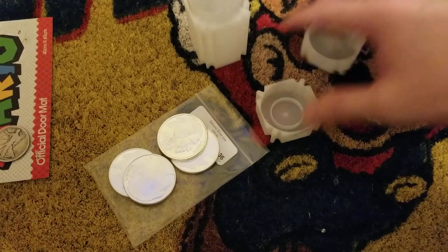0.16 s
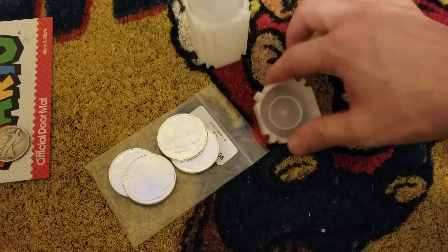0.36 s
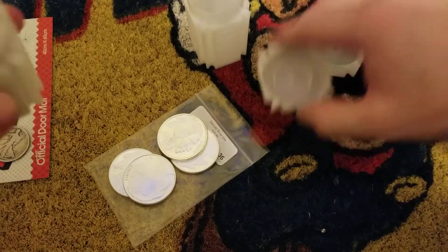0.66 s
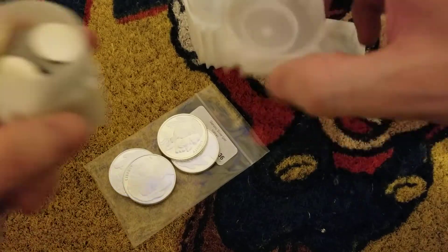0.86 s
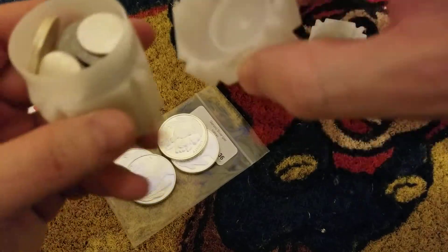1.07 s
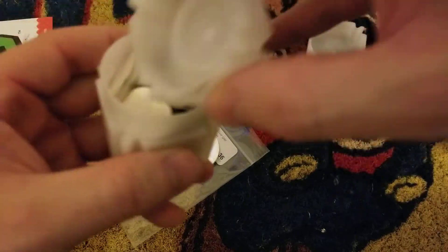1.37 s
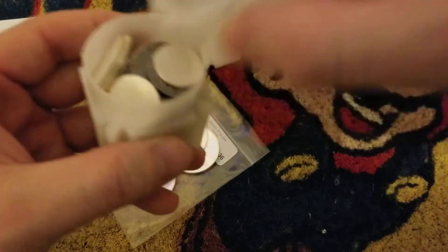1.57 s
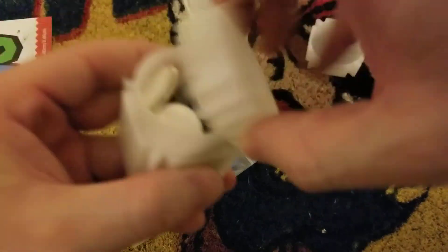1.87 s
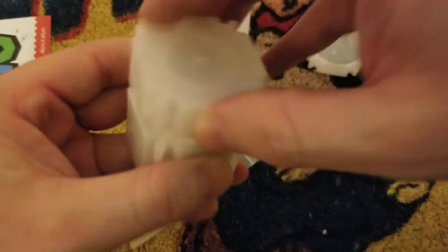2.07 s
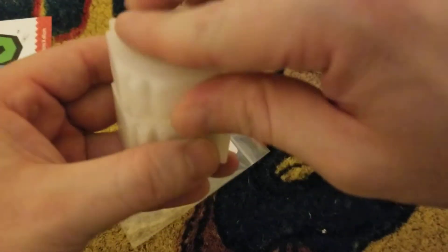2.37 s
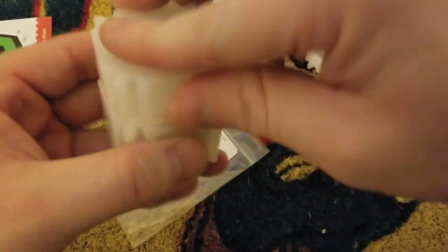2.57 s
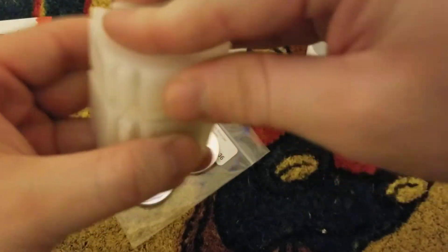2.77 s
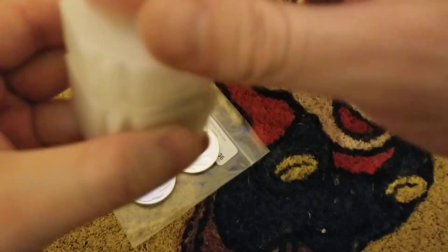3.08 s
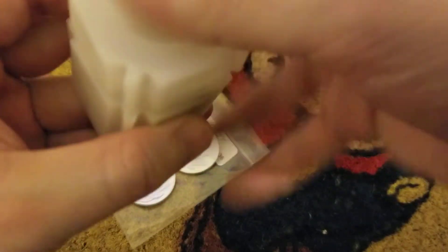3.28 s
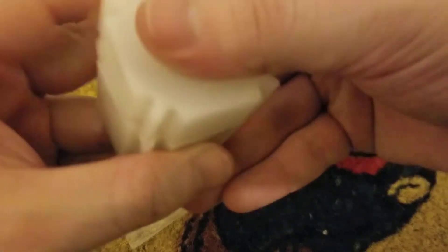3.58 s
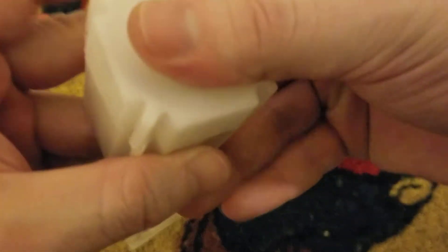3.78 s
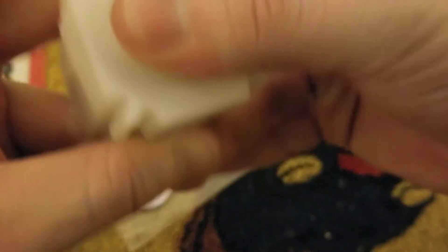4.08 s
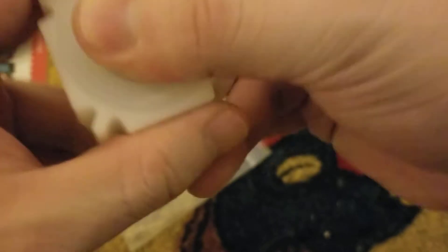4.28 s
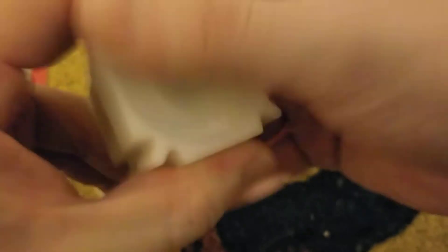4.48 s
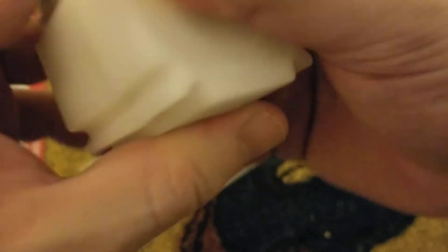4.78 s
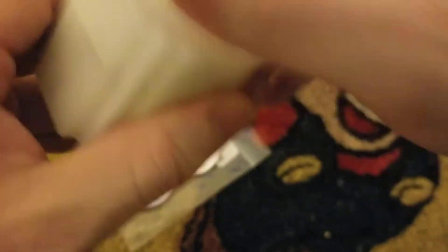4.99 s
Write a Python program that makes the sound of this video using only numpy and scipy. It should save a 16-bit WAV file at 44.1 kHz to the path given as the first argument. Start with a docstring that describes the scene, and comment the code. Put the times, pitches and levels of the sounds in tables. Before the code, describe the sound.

Close up in a small room, a plastic cap clicks and drags briefly on a coarse mat, then fingers rub it. Coins rattle shortly in a plastic tube, the cap knocks hollowly against it, skin slides softly, and the cap snaps hard twice, about a second apart, before small closing clicks. Low uneven rumble and faint hiss lie underneath.

```python
"""Plastic clicks and a cap dragging over a doormat come first, over a low rumble and faint hiss.
Hands lift the hollow cap, tip a plastic tube of coins, knock the cap onto it and press it shut.
Contacts: noise cracks plus struck modes of cap air and tube wall. Coins: knocks through metal modes.
Fingers: grainy coloured noise. Mat: low modes and bumpy noise. Close microphone, short decaying-noise room."""
import sys
import numpy as np
from scipy import signal
from scipy.fft import rfft, irfft, next_fast_len
from scipy.io import wavfile
from scipy.ndimage import map_coordinates

SR = 44100
rng = np.random.default_rng(int(sys.argv[2]) if len(sys.argv) > 2 else 0)


def wrap_up_sound(samples):
    """Save the sound to the file named by the first command line argument, as 16-bit audio."""
    columns = np.atleast_2d(samples).T
    # keep every value between -1 and 1, then stretch to whole-number steps
    tamed = np.clip(columns, -1, 1)
    steps = np.round(tamed * 32767).astype(np.int16)
    wavfile.write(sys.argv[1], SR, steps)


N = 226301


def amp(db):
    """dB to linear gain."""
    return 10 ** (np.asarray(db) / 20)


def unit(x):
    """Scale to rms 1."""
    return x / np.sqrt(np.mean(x ** 2) + 1e-20)


def along(points, hz):
    """Interpolate (hz, value) points on a log frequency axis."""
    point_hz, value = np.transpose(points)
    return np.interp(np.log(hz + 1), np.log(point_hz + 1), value)


def curves(rows):
    """One per-sample curve for each column after the time."""
    time_s, *columns = np.transpose(rows)
    return [np.interp(np.arange(N) / SR, time_s, column) for column in columns]


def wobble(knots_per_s):
    """Smooth random curve through normal knots."""
    knots = rng.standard_normal(int(N * knots_per_s / SR) + 4)
    return map_coordinates(knots, [np.arange(N) * knots_per_s / SR])


def filtered(x, response):
    """Apply a complex frequency response by FFT, zero-padded."""
    size = next_fast_len(len(x) + 4096)
    return irfft(rfft(x, size) * response(np.fft.rfftfreq(size, 1 / SR)), size)[:len(x)]


def mode(hz, width_hz):
    """Causal second-order resonance, gain 1 at its centre."""
    return lambda f: 1j * f * width_hz / (hz * hz - f * f + 1j * f * width_hz)


def noise(spectrum):
    """Noise coloured by (hz, dB) points, rms 1."""
    return unit(filtered(rng.standard_normal(N), lambda hz: amp(along(spectrum, hz))))


def decay(t, t60_s, attack_s):
    """Exponential decay with a soft attack."""
    return amp(-60 * t / t60_s) * (1 - np.exp(-t / attack_s))


def ring(t, hz, t60_s, attack_s):
    """Struck mode: a decaying sine."""
    return np.sin(2 * np.pi * hz * t) * decay(t, t60_s, attack_s)


def add(track, start_s, sound):
    """Mix a sound into a track, cut at the track's end."""
    spot = track[max(round(start_s * SR), 0):][:len(sound)]
    spot += sound[:len(spot)]


# low rumble level: time_s, level_db
RUMBLE_LEVEL = [(0, -43), (.2, -54.5), (1.0, -50), (1.13, -61), (1.39, -54.5), (2.34, -50), (2.8, -57),
                (3.31, -49), (3.52, -56.5), (3.6, -39), (3.79, -52.5), (4.87, -55), (5.13, -41)]
# rumble spectrum: pitch_hz, relative level_db (per Hz)
RUMBLE_SPECTRUM = [(12, -51), (20, -30.5), (39, -7), (60, 1.5), (91, -11.5), (123, -13.5), (193, -27.5),
                   (230, -25), (400, -39.5), (520, -72), (880, -120)]
# room and microphone hiss spectrum: pitch_hz, relative level_db (per Hz)
HISS_SPECTRUM = [(150, -35), (250, -10.5), (702, -4), (961, -12), (1740, -10.5), (2270, -17.5),
                 (3960, -31.5), (8410, -10), (12600, -15.5), (14200, -14.5), (16400, -25)]
HISS_DB = -74


def background():
    """Uneven low rumble plus a nearly steady hiss of room and microphone, both coloured noise."""
    uneven = unit(amp(1.5 * wobble(25)) * noise(RUMBLE_SPECTRUM))
    rumble = amp(curves(RUMBLE_LEVEL)[0]) * uneven
    return rumble + amp(HISS_DB + 0.54 * wobble(32)) * noise(HISS_SPECTRUM)


# reverberation time: pitch_hz, t60_s
ROOM_DECAY = [(300, 0.24), (2300, 0.21), (8000, 0.15), (15000, 0.16)]


def room(x):
    """Noise tails of unit energy, each frequency with its own decay; each 1/8 s of input meets a new tail."""
    out, step = np.zeros(N), SR // 8
    for i in range(0, N, step):
        hz, t, bins = signal.stft(rng.standard_normal(SR // 3), SR, nperseg=256)
        fade = amp(-60 * t / along(ROOM_DECAY, hz)[:, None])
        tail = signal.istft(bins * fade, SR, nperseg=256)[1]
        tail = tail / np.linalg.norm(tail)
        add(out, i / SR + 0.0041, signal.fftconvolve(x[i:i + step], tail))
    return out


# soft bumps that shake the microphone stand: start_s, level_db
BUMPS = [(0.828, -32.5), (2.675, -38), (2.819, -37), (3.251, -36.5), (4.048, -30.5), (4.142, -35.5),
         (4.691, -35), (4.972, -31)]
STAND_HZ, STAND_T60_S = 59.2, 0.14


def stand_bumps():
    """Each bump rings one low mode of the microphone stand."""
    out, t = np.zeros(N), np.arange(SR // 4) / SR
    for start_s, level_db in BUMPS:
        add(out, start_s, -amp(level_db) * ring(t, STAND_HZ, STAND_T60_S, 0.0008))
    return out


# low pushes of the harder contacts: start_s, level_db, pitch_hz
THUMPS = [(0.012, -25.5, 195), (.026, -16, 180), (0.068, -16.5, 162), (.113, -21.5, 175),
          (.519, -32.5, 201), (1.876, -25.5, 261.1), (1.992, -29, 139), (2.063, -28, 178),
          (3.562, -3, 110.7), (3.5633, -9, 322), (4.537, -21, 97)]
THUMP_T60_CYCLES = 4.5


def thumps():
    """Each push is a low mode that dies within a few cycles."""
    out, t = np.zeros(N), np.arange(SR // 4) / SR
    for start_s, level_db, hz in THUMPS:
        add(out, start_s, -amp(level_db) * ring(t, hz, THUMP_T60_CYCLES / hz, 0.00052))
    return out


# cap dragged over the mat: time_s, level_db
DRAG_LEVEL = [(0.0, -33), (0.074, -33), (0.298, -58), (0.59, -44), (0.72, -102)]
# bristle noise spectrum: pitch_hz, relative level_db (per Hz)
MAT_SPECTRUM = [(47, -51), (80, -18), (151, 4), (188, -12), (227, -4.5), (321, -18.5), (700, -35),
                (910, -68), (1540, -120)]


def mat_drag():
    """Cap bumping over the bristles: low noise with random swells, ended at the last level point."""
    dragging = np.arange(N) < DRAG_LEVEL[-1][0] * SR
    bristles = unit(amp(3 * wobble(40)) * noise(MAT_SPECTRUM))
    return amp(curves(DRAG_LEVEL)[0]) * dragging * bristles


# air in the cap, tuned by how far mat, fingers or tube close its mouth: time_s, pitch_hz, nominal width_hz
CAP_AIR = [(0, 2823, 704), (.21, 2820, 693), (0.234, 2200, 299), (.55, 2146, 352.7), (.86, 2300, 259.4),
           (1.95, 2330, 259.2), (2.06, 2067, 303), (2.2, 2220, 301.4), (2.901, 2353, 297.8),
           (3.15, 2647, 701), (3.3, 2941, 804.4), (5.13, 2838, 958)]


def cap_air(hz, width_hz):
    """Narrow noise of rms 1 around a moving centre; a wider resonance flutters faster."""
    flutter = np.cumsum(width_hz) / SR * 0.9
    knots = rng.standard_normal((2, N // 20))
    cos_part, sin_part = (map_coordinates(k, [flutter]) for k in knots)
    phase = 2 * np.pi * np.cumsum(hz) / SR
    return unit(cos_part * np.cos(phase) + sin_part * np.sin(phase))


def swell(u, peak_place):
    """Rises to 1 at peak_place (0-1), then dies."""
    peak_place = np.clip(peak_place, 0.02, 0.98)
    return np.sin(np.interp(u, [0, peak_place, 1], [0, np.pi / 2, np.pi])) ** 1.9


# fingers sliding over the plastic: time_s, hiss_db
SLIDE_LEVEL = [(0, -61), (.19, -59.5), (.52, -64.5), (.66, -75), (.75, -60.5), (.94, -62.5), (1.11, -67),
               (1.34, -87), (1.4, -65), (1.6, -71.5), (1.79, -82), (2.03, -63.5), (2.15, -74.5),
               (2.42, -63), (2.5, -77), (2.8, -78.5), (3.0, -63), (3.17, -56), (3.32, -63.5), (3.53, -73.5),
               (3.64, -58), (3.86, -65.5), (3.96, -80.5), (4.2, -66), (4.35, -77.5), (4.52, -53.5),
               (4.75, -79), (4.9, -61.5), (5.13, -72)]
# quick swipes of skin on a rib: start_s, length_s, peak_place (0-1), hiss_db, hiss_hz, hollow_db, wall_db
SWIPES = [(.246, 0.039, 0.96, -59, 8460, -51.5, -67), (.409, 0.059, 0.8, -51.5, 8700, -65, -80),
          (.498, 0.06, 0.43, -54, 9100, -65, -56), (.708, 0.1, 0.52, -54, 7970, -58, -56.5),
          (.783, 0.074, 0.46, -62, 9000, -72, -57), (.98, 0.078, 0.75, -53.5, 6250, -50, -66.5),
          (1.54, 0.031, 0.52, -46, 9800, -57.5, -79), (1.98, 0.021, 0.63, -56, 7600, -33.5, -41),
          (2.187, 0.088, 0.17, -58, 13400, -57, -68), (2.29, 0.067, 0.21, -55.5, 13000, -60, -64),
          (2.375, 0.086, 0.32, -63, 6000, -63, -84), (2.756, 0.072, 0.33, -65, 7900, -71, -72.5),
          (3.062, .028, 0.72, -31, 4894, -40, -73), (3.095, 0.04, 0.4, -58, 9000, -59, -77),
          (3.15, 0.084, 0.4, -88, 6000, -53, -63), (3.484, .03, 0.5, -59, 11970, -81, -80),
          (3.674, 0.051, 0.43, -59, 4440, -54.5, -52), (3.742, 0.036, 0.33, -44.5, 8680, -50, -52.5),
          (4.041, .014, 0.32, -44.5, 10100, -69, -73), (4.15, .13, 0.32, -50.5, 12800, -59.5, -73),
          (4.408, 0.085, 0.71, -29.5, 6510, -40.5, -65), (4.653, 0.035, 0.37, -59.5, 11500, -74.5, -78),
          (4.781, 0.068, 0.54, -56, 6330, -62.5, -78.5), (4.909, 0.05, .65, -46, 5770, -64, -80),
          (5.009, 0.13, 0.26, -51.5, 5460, -73, -81.5), (5.076, .064, 0.5, -54.5, 7960, -43, -52)]
# loose plastic rattling and ringing on after a hard knock: start_s, length_s, hiss_db, hollow_db, wall_db
AFTER_RATTLE = [(1.815, 0.1, -53, -36, -42), (1.878, 0.14, -73, -50.5, -59),
                (2.005, 0.081, -57, -52, -44.5), (3.257, 0.042, -41.5, -40.5, -51.5),
                (3.557, 0.095, -35.5, -39, -38), (4.556, 0.063, -54.5, -60.5, -60.5)]
AFTER_RATTLE_PEAK_PLACE, AFTER_RATTLE_HZ = 0.09, 6000
# skin on the loose cap: pitch_hz, relative level_db (per Hz)
LOOSE_SKIN = [(1500, -28.5), (2600, -11.5), (3150, -6.5), (4200, -10.5), (5800, -8.5), (8700, -7),
              (10500, -9), (14000, -9.5), (16400, -17.5)]
# skin on the shut tube: pitch_hz, relative level_db (per Hz)
SHUT_SKIN = [(710, -58.5), (1200, -20), (2210, -4.5), (3010, -5.5), (4760, -2), (5790, -2), (8670, -2.5),
             (10000, -3), (14500, -2), (16400, -8)]
# wall the hands touch, damped and tuned by the grip: time_s, pitch_hz
WALL_PITCH = [(0, 586), (.135, 630), (.16, 1444), (1.7, 1154), (1.87, 1150), (1.99, 890), (2.01, 760),
              (2.8, 850), (3.1, 1230), (3.5, 1200), (3.562, 550), (3.59, 1398), (3.75, 1200), (4.2, 1150),
              (4.8, 1100), (4.97, 600), (5.07, 1302)]
# resonance level relative to the slide hiss, cap loose and cap shut
HOLLOW_LOOSE_DB, HOLLOW_SHUT_DB = -7, -15.5
WALL_LOOSE_DB, WALL_SHUT_DB = -9.5, -16.5
ON_MAT_DB, LIFT_S = 6.5, 0.59  # the mat's backing makes the wall louder until the cap is lifted


def fingers():
    """Skin catches and slips, and loose plastic rattles: noise grains that also sound cap air and tube wall."""
    time_s = np.arange(N) / SR
    hiss, wall_hz = amp(curves(SLIDE_LEVEL)[0]), curves(WALL_PITCH)[0]
    cap_hz, cap_width_hz = curves(CAP_AIR)
    shut = np.clip((time_s - 2.9) / 0.2, 0, 1)  # the cap comes to sit on the tube
    hollow = hiss * amp(HOLLOW_LOOSE_DB + (HOLLOW_SHUT_DB - HOLLOW_LOOSE_DB) * shut)
    wall_level = hiss * amp(WALL_LOOSE_DB + (WALL_SHUT_DB - WALL_LOOSE_DB) * shut)
    wall_level = wall_level * amp(ON_MAT_DB * (np.arange(N) < LIFT_S * SR))

    grain = amp(1.5 * wobble(300) + 1.2 * wobble(40))

    def slips():
        return grain * amp(2.5 * wobble(120)) * rng.standard_normal(N)

    skin_noise = (1 - shut) * noise(LOOSE_SKIN) + shut * noise(SHUT_SKIN)
    skin = unit(grain * amp(1.1 * wobble(900)) * skin_noise)
    knocks = unit(slips())
    wall_noise = unit(filtered(slips(), lambda f: mode(1150, 1200)(f) ** 2))
    out = hiss * skin + wall_level * wall_noise

    rattles = [(start_s, length_s, AFTER_RATTLE_PEAK_PLACE, hiss_db, AFTER_RATTLE_HZ, hollow_db, wall_db)
               for start_s, length_s, hiss_db, hollow_db, wall_db in AFTER_RATTLE]
    for start_s, length_s, peak_place, hiss_db, hiss_hz, hollow_db, wall_db in [*SWIPES, *rattles]:
        tube_hz = wall_hz[round((start_s + length_s / 2) * SR)]
        u = np.linspace(0, 1, round(length_s * SR))
        shape = swell(u, peak_place)
        span = slice(round(start_s * SR), round(start_s * SR) + len(u))
        rub = filtered(skin[span], lambda f: 1 + 1.3 * mode(hiss_hz, 0.22 * hiss_hz)(f))
        wall = filtered(knocks[span], lambda f: mode(tube_hz, 0.9 * tube_hz)(f) ** 2)
        contact = amp(hiss_db) * unit(rub) + amp(wall_db) * unit(wall)
        add(out, start_s, shape[:len(rub)] * contact)
        add(hollow, start_s, amp(hollow_db) * shape)
    return out + hollow * unit(grain) * cap_air(cap_hz, 2.2 * cap_width_hz)


# coins slide and knock in the tube: start_s, rattle_db, body_db (tube and cap drive)
CHINKS = [(1.3587, -26.5, 3.5), (1.363, -21, -1.5), (1.3744, -20, 5), (1.3786, -25.5, 0), (1.39, -23, 0),
          (1.399, -37, -12), (1.4115, -42, -13.5), (1.4222, -41.5, -10), (1.4353, -29, -1.5),
          (1.4458, -33, -9)]
# coin modes: pitch_hz, width_hz, relative level_db
COIN_MODES = [(5300, 300, -10), (7400, 300, -12), (8100, 300, -13), (10650, 260, 0), (12850, 350, -2),
              (13500, 450, -4), (14600, 400, -8)]
COIN_RING_DB, COIN_RING_HZ = -5, 45  # long, narrow part of each mode: relative level, width
RATTLE_T60_S = 0.038


def coin_metal(f):
    """Response of the damped coins: bright direct part plus wide and narrow modes."""
    modes = 0
    for hz, width_hz, level_db in COIN_MODES:
        narrow = amp(COIN_RING_DB) * mode(hz, COIN_RING_HZ)(f)
        modes = modes + amp(level_db) * (mode(hz, width_hz)(f) + narrow)
    return 0.96 * f * f / (f + 3500 / 1j) ** 2 + 4 * modes


def coin_body(f):
    """Response of the tube and the cap held near it."""
    return 0.57 * mode(1300, 170)(f) - mode(2390, 180)(f) + 0.089 * mode(1200, 1800)(f)


def coins():
    """Decaying noise bursts stand for tiny knocks that excite coins, tube and cap."""
    rattle, knocks, t = np.zeros(N), np.zeros(N), np.arange(SR // 10) / SR
    fade = decay(t, RATTLE_T60_S, 0.001)
    for start_s, rattle_db, body_db in CHINKS:
        add(rattle, start_s, amp(rattle_db) * fade * rng.standard_normal(len(t)))
        add(knocks, start_s, amp(body_db) * fade ** 2 * rng.standard_normal(len(t)))
    return filtered(rattle, coin_metal) + filtered(knocks, coin_body)


# small ticks under the sliding fingers
TICKS_PER_S = 14  # mean over the scene
TICK_DB, TICK_SPREAD_DB = 9, 3.5  # offset over the slide hiss; spread per neper of chance
TICK_CAP_DB, TICK_TUBE_DB = 0.5, -11  # relative to the crack


def ticks():
    """Random small contacts, as dense and as loud as the sliding under them."""
    chance = rng.random((round(TICKS_PER_S * N / SR), 3))
    travel = np.cumsum(amp(curves(SLIDE_LEVEL)[0]))
    start_s = np.interp(chance[:, 0], travel / travel[-1], np.arange(N) / SR) * 0.998
    slide_db = np.interp(start_s, *np.transpose(SLIDE_LEVEL))
    crack_db = slide_db + TICK_DB - TICK_SPREAD_DB * np.log(chance[:, 1] + 0.0089)
    crack_hz = 4000 + 7000 * chance[:, 2]
    return np.transpose([start_s, crack_db, crack_db + TICK_CAP_DB, crack_db + TICK_TUBE_DB, crack_hz])


# plastic contacts: start_s, crack_db, cap_db (hollow ring), tube_db (knock), crack_hz
CLICKS = [(.0247, -44, -23, -22, 3420), (.0665, -39, -46, -26.5, 5630), (.0915, -30, -27, -31, 9900),
          (.1084, -34.5, -28.5, -58, 9690), (.1326, -36, -28, -39, 12600),
          (.1382, -33.5, -29.5, -57, 11400), (.1454, -38, -30, -38.5, 5460), (.186, -40.5, -37, -60, 5570),
          (.2024, -39, -33.5, -43, 11700), (.3202, -47.5, -27, -63.5, 8500),
          (.3434, -37, -31.5, -39.5, 8500), (.3725, -49, -42, -40.5, 5650), (.3934, -36, -35, -44, 8600),
          (.4943, -40, -45, -62, 8700), (.5255, -37.5, -39, -59, 8500), (.6943, -39, -61, -71, 6320),
          (.8512, -29, -29.5, -40, 8100), (1.1391, -53, -63, -58, 7650), (1.8063, -39, 2, -5, 4100),
          (1.813, -34, -10.5, -29, 4437), (1.8685, -52, -18, -17.5, 3528), (1.874, -26, -11, -12.5, 3300),
          (1.9164, -44, -36, -41, 9140), (1.9879, -19, -15.5, -14, 9000), (1.9975, -39, -35.5, -19.5, 8040),
          (2.0546, -50, -23.5, -27, 3620), (2.0642, -41, -17, -14.5, 7400),
          (2.2656, -41.5, -42, -47.5, 6000), (2.3221, -32.5, -40, -36, 4710),
          (2.3508, -31.5, -38.5, -46, 5760), (2.7721, -52.5, -41, -61, 7760), (2.9507, -44, -48, -73, 9600),
          (2.9701, -42, -43.5, -75, 6440), (2.9818, -45, -39.5, -68, 7730), (3.178, -62, -24.5, -44, 3500),
          (3.192, -53, -25.5, -50, 4090), (3.2181, -34, -22.5, -48, 4170), (3.2337, -19, -14.5, -31, 7910),
          (3.241, -14, -5, -34.5, 9400), (3.2526, -22, -15, -43, 9450), (3.267, -21, -19.5, -48, 9400),
          (3.2954, -35.5, -25, -39, 9700), (3.5645, -2.5, -0.5, -3, 6960),
          (3.5897, -15.5, -13, -36.5, 8030), (3.5997, -36, -24, -40, 7060),
          (3.6194, -29.5, -19.5, -29.5, 7930), (3.686, -39, -27, -53, 4060),
          (3.7408, -35, -41.5, -36, 5030), (3.8422, -41.5, -24.5, -67, 3735), (3.8524, -38, -30, -60, 5380),
          (3.8626, -41.5, -47, -66, 5320), (3.8755, -43, -32.5, -70, 8620), (3.9755, -70.5, -65, -57, 4000),
          (4.0457, -34.5, -52, -57, 9900), (4.1643, -37.5, -30, -70, 8550), (4.1772, -34, -26.5, -75, 3570),
          (4.1994, -38, -25, -65, 6340), (4.2715, -38.5, -60, -61, 6800), (4.3174, -51, -67.5, -69, 5400),
          (4.3958, -40, -69, -66.5, 8790), (4.5377, -4.5, 4, -38.5, 5840), (4.6195, -39, -32, -53, 3503),
          (4.8804, -53, -42, -48.5, 3560), (4.8909, -46, -50, -62, 7510), (4.9718, -44, -52.5, -41.5, 3900),
          (5.0867, -33, -23, -42, 3640), (5.0975, -27, -14.5, -37.5, 3720), (5.1094, -32, -18, -41, 3630)]


def clicks():
    """Each contact cracks, rings the air in the cap and knocks the tube wall."""
    out, t = np.zeros(N), np.arange(SR // 10) / SR
    cap_hz, cap_width_hz = curves(CAP_AIR)
    wall_hz, = curves(WALL_PITCH)
    for start_s, crack_db, cap_db, tube_db, crack_hz in [*CLICKS, *ticks()]:
        i = round(start_s * SR)
        tube_hz = wall_hz[i]
        burst_t60_s = 0.015 + 0.0052 * amp(crack_db) ** 0.5  # harder contacts chatter longer
        burst = rng.standard_normal(len(t)) * decay(t, burst_t60_s, 0.0001)

        def crack_response(f):
            thin = f * f / (f + 3000 / 1j) ** 2
            peak = 0.5 + mode(crack_hz, 0.26 * crack_hz)(f)
            return thin * peak / (1 + 1j * f / 1.5 / crack_hz) ** 2

        crack = filtered(burst, crack_response)
        life_s = 2.95 / cap_width_hz[i]  # narrower resonance rings longer
        cap = ring(t, cap_hz[i], 0.81 * life_s, 0.00029)
        cap = cap + 0.081 * ring(t, 1.2 * cap_hz[i], 4 * life_s, 0.0065)
        chatter = filtered(burst, mode(tube_hz, 0.66 * tube_hz))
        tube = 0.95 * ring(t, tube_hz, 0.01, 0.0006) + 0.63 * chatter / abs(chatter).max()
        crack = amp(crack_db) * crack / abs(crack).max()
        add(out, start_s + 0.0005, crack + amp(cap_db) * cap + amp(tube_db) * tube)
    return out


def scene():
    """Plastic, coins and fingers with their room answer, plus mat, stand and background."""
    near = clicks() + coins() + fingers()
    low = thumps() + stand_bumps() + mat_drag()
    return (near + amp(-17.0) * room(near) + low + background())[None]


TOP_HZ, EDGE_HZ = 16500, 900  # band limit, width of the taper below it


def record(dry):
    """The microphone rolls off the deep bass; nothing is kept above the band limit."""
    def response(hz):
        bass = (hz / (hz + 38 / 1j)) ** 2
        return bass * np.clip((TOP_HZ - hz) / EDGE_HZ, 0, 1) ** 2

    return filtered(dry[0], response)[None]


dry = scene()
out = record(dry)
wrap_up_sound(out)
```